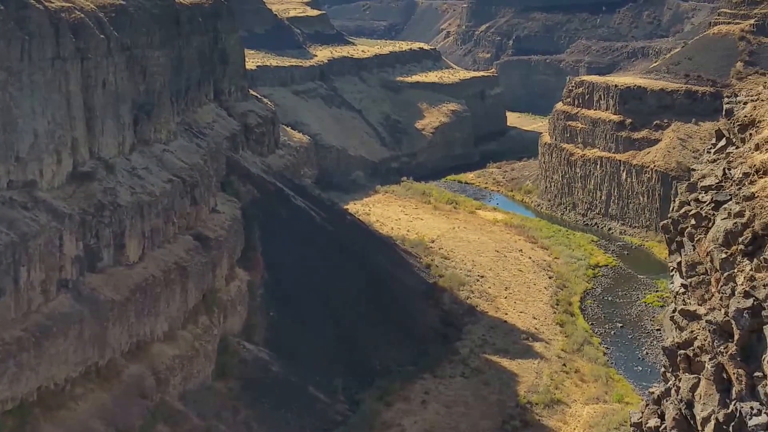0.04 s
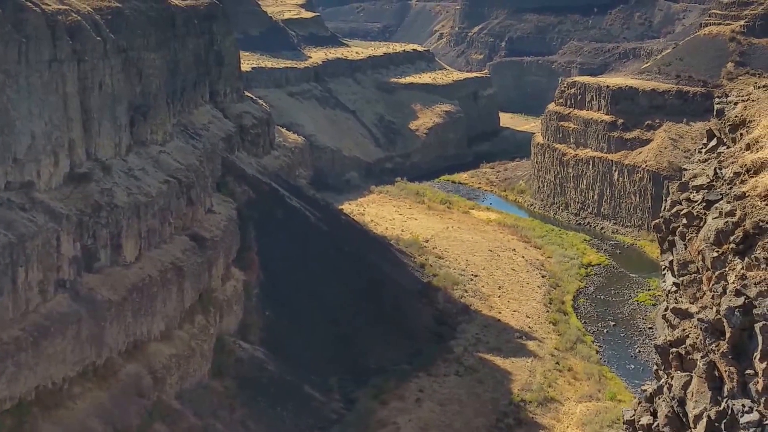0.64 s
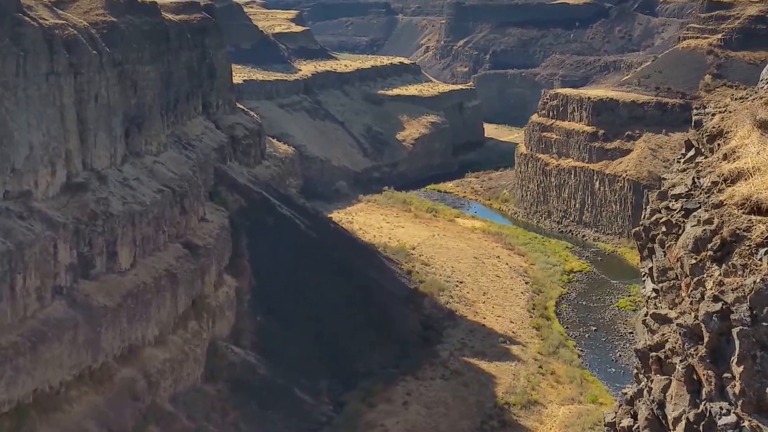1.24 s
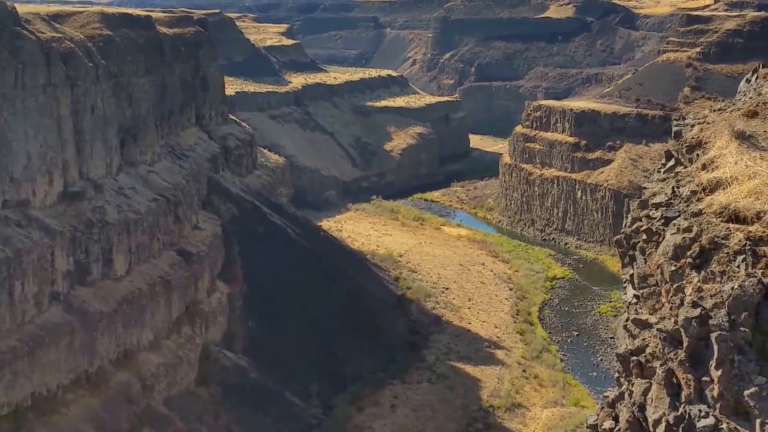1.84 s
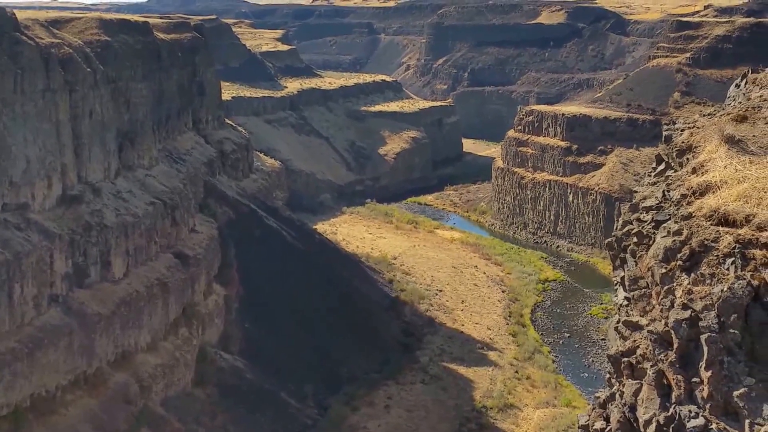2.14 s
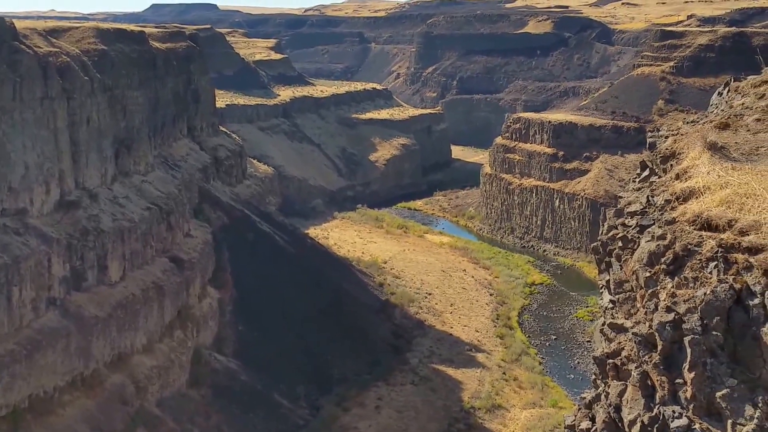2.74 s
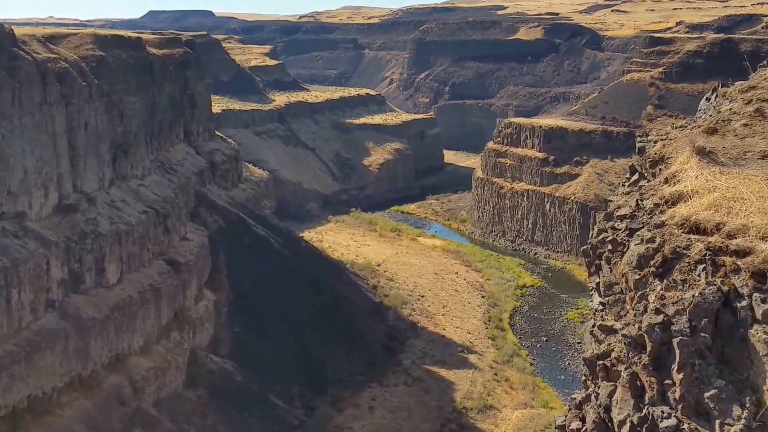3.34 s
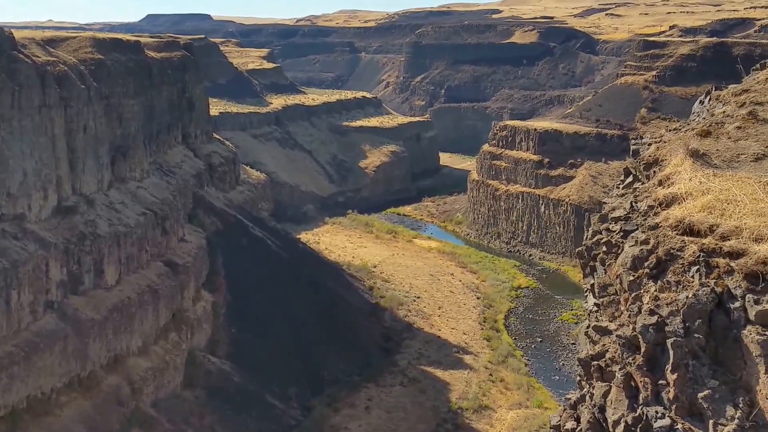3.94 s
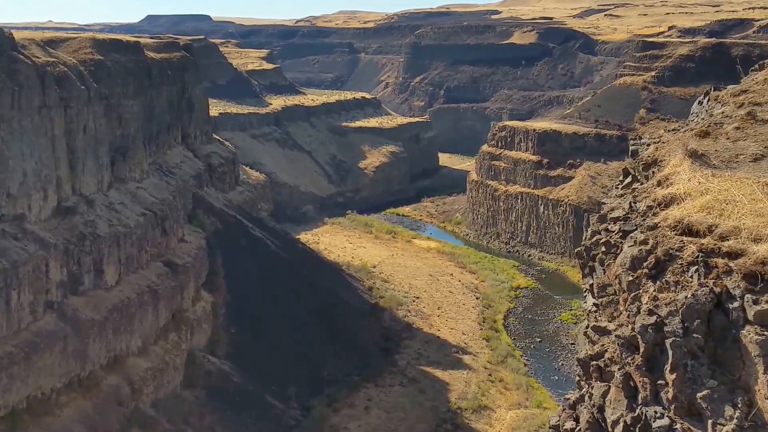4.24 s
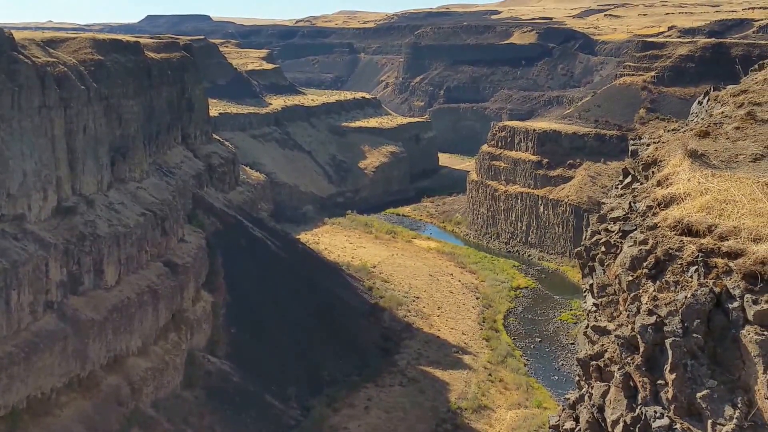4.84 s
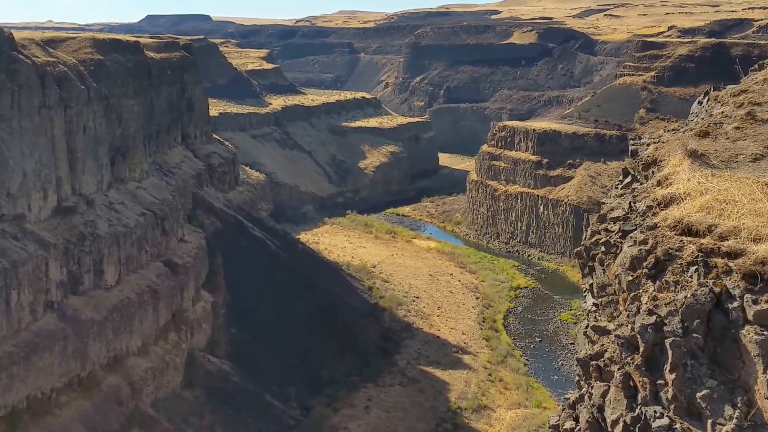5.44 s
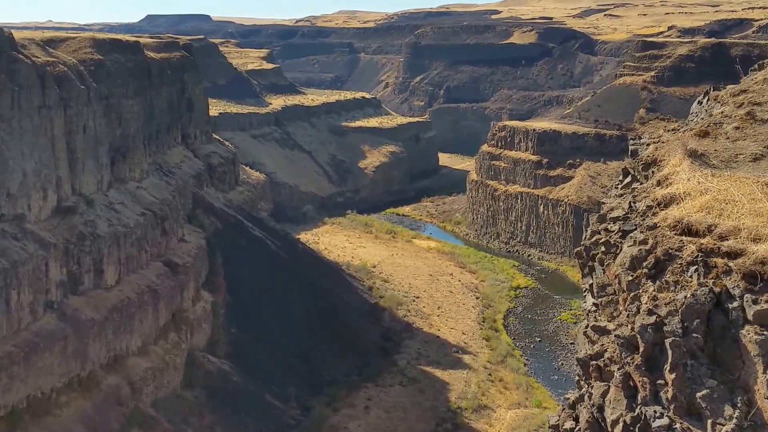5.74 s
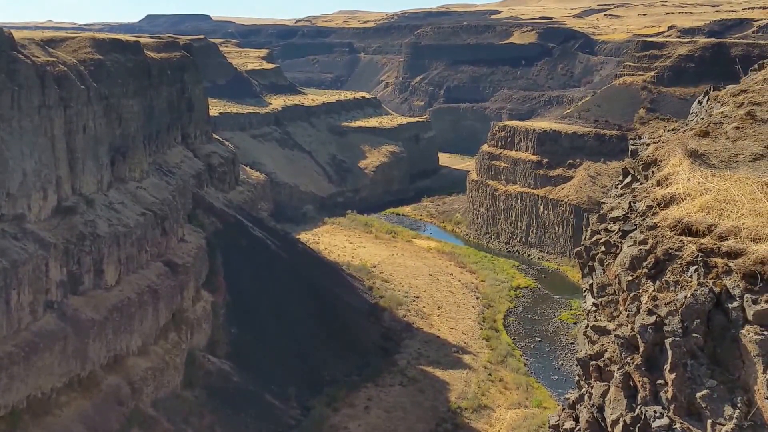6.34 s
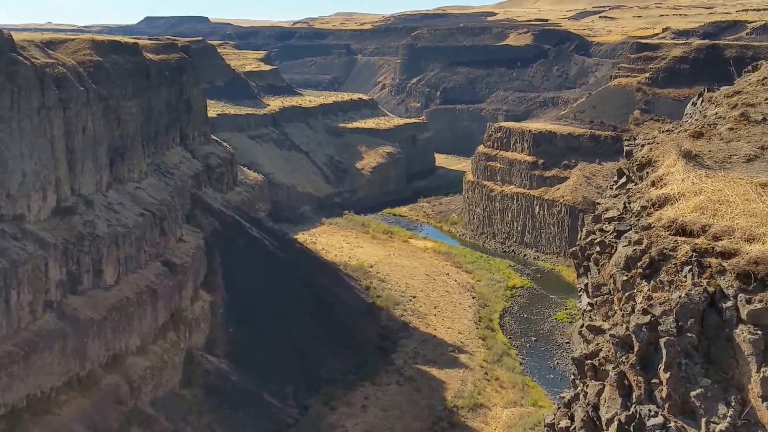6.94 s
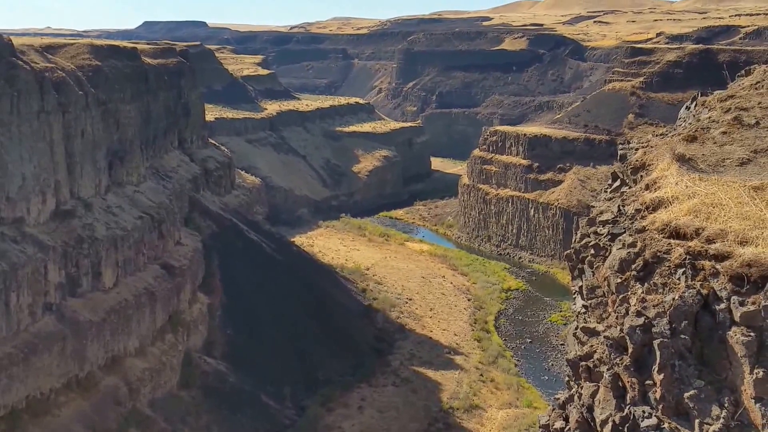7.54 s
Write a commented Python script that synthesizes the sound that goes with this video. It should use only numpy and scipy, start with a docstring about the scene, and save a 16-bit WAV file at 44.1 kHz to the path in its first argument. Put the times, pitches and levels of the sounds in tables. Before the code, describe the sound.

Gusty wind buffets the microphone with low, sputtering rumbles over the faint, steady rush of distant water.

```python
"""A waterfall and a river rush far below the rim of an open canyon; two microphones hiss faintly.
From the start, gusts buffet each microphone port on its own; from 0.5 s hard eddies slap the ports
and leave short churning wakes. An insect buzzes once at 1.4 s. From 2.4 s dry grit crackles nearby
now and then. The wind lulls from about 5.2 to 6.2 s, then gusts again."""
import sys
import numpy as np
from scipy import signal
from scipy.fft import rfft, irfft
from scipy.io import wavfile
from scipy.ndimage import uniform_filter1d, minimum_filter1d

SR = 44100
rng = np.random.default_rng(int(sys.argv[2]) if len(sys.argv) > 2 else 0)


def to_wav(sig):
    """Store sig (one row per channel, or 1-D mono) as 16-bit WAV at the path in sys.argv[1].

    Samples outside -1..1 are clipped; the rate is SR.
    """
    pcm = np.clip(np.atleast_2d(sig), -1, 1) * 32767
    pcm = np.round(pcm).astype(np.int16)
    wavfile.write(sys.argv[1], SR, pcm.T)  # frames by channels


N = 339570
TIME_S = np.arange(N) / SR
FREQ_HZ = np.fft.rfftfreq(N, 1 / SR)


def gain_of(db):
    """Decibels to amplitude."""
    return 10 ** (np.asarray(db) / 20)


def unit_rms(x):
    """Scale to rms 1."""
    return x / np.sqrt(np.mean(x ** 2) + 1e-20)


def curves(table, hz=FREQ_HZ):
    """Value columns of a table, interpolated over log frequency."""
    table_hz, *columns = np.transpose(table)
    return np.array([np.interp(np.log(hz + 1), np.log(table_hz + 1), c) for c in columns])


def add(mix, at_s, sound):
    """Mix a sound in, in place."""
    part = mix[..., max(round(at_s * SR), 0):][..., :sound.shape[-1]]
    part += sound[..., :part.shape[-1]]


def white():
    """White noise spectrum, unit power per Hz."""
    return rfft(rng.standard_normal(N)) * np.sqrt(SR / 2)


def wander(rate_hz):
    """Smooth random curve, rms 1."""
    return unit_rms(irfft(white() * np.exp(-(FREQ_HZ / rate_hz) ** 2) * (FREQ_HZ > 0), N))


# Distant water: f/Hz, left density/dB, right density/dB
WATER_SPECTRUM = [(30, -82, -95), (100, -77, -80.5), (270, -78, -76.5), (460, -82, -82),
                  (764, -78.5, -78.5), (1400, -80.5, -78.5), (1990, -82, -80.5), (2147, -79.5, -83.5),
                  (2990, -88.5, -94), (3360, -89, -91), (4280, -96.5, -91.5), (5320, -104.5, -102.6),
                  (6000, -104.8, -106.4), (6800, -112.6, -113.5)]
# Water between the ports: f/Hz, coherence/1, left lead/rad
WATER_COHERENCE = [(100, 0.61, 0.0), (300, 0.98, 0.2), (520, 0.83, 1.1), (750, 0.72, 0.9),
                   (1150, 0.56, 2.4), (1500, 0.74, 3.0), (1900, 0.43, 4.2), (2300, 0.65, 6.0),
                   (2600, 0.38, 6.1), (2800, 0.19, 5.0), (3300, 0.45, 4.6), (3700, 0.14, 5.6),
                   (4000, 0.27, 7.2), (4600, 0.18, 8.8), (5200, 0.34, 10.2), (5900, 0.09, 11.6)]


def water(swell_db=0.2, cutoff_hz=7000):
    """Countless far splashes merge into a smooth rush that reaches the left port first."""
    coherence, lead_rad = curves(WATER_COHERENCE)
    left = white()
    right = (coherence * left + np.sqrt(1 - coherence ** 2) * white()) * np.exp(-1j * lead_rad)
    distance_loss = 1 / np.hypot(1, (FREQ_HZ / cutoff_hz) ** 10)
    rush = irfft(np.array([left, right]) * gain_of(curves(WATER_SPECTRUM)) * distance_loss, N)
    return rush * gain_of(swell_db * wander(rate_hz=3.6))


# Microphone self-noise: f/Hz, left density/dB, right density/dB
HISS_SPECTRUM = [(7000, -116, -116), (8440, -115.5, -116.5), (10600, -112.1, -115.6),
                 (15000, -112.2, -114.2)]


def hiss():
    """Independent self-noise of two microphones."""
    return irfft(np.array([white(), white()]) * gain_of(curves(HISS_SPECTRUM)), N)


# Light air between gusts: t/s, level/dB
BREEZE_LEVELS = [(0, -48.5), (.3, -37.5), (1.35, -31.5), (1.93, -43.5), (2.3, -36), (3.15, -39.5),
                 (3.75, -30), (4.03, -48), (4.35, -35.5), (5.12, -45), (5.26, -70), (6.02, -63),
                 (6.27, -38), (6.5, -46.5), (6.87, -42), (7.1, -39), (7.7, -36)]


def breeze(port, right_db=-5, knee_hz=280):
    """Slow air makes a dull rumble. Returns flow: rows of power and power * knee_hz."""
    level_db = np.interp(TIME_S, *np.transpose(BREEZE_LEVELS)) + port * right_db
    return np.outer([1, knee_hz], gain_of(level_db) ** 2)


# Turbulent pressure: f/Hz, relative density/dB
TURBULENCE_SPECTRUM = [(15, -35), (40, -6), (65, -2), (110, 1), (200, -4.5), (400, -9), (800, -15),
                       (1600, -16)]


def turbulence(knee_hz, lump_db=5, lump_octaves=0.28, rolloff_order=3.96):
    """Sputtering rumble, running rms 1; eddies above a moving knee frequency die away."""
    lumps = np.clip(wander(rate_hz=60), -2, 1.8)
    cutoff_hz = knee_hz * 2 ** (lump_octaves * (lumps - 1))  # strong lumps of air are sharpest
    colour = gain_of(curves(TURBULENCE_SPECTRUM)[0]) / np.hypot(1, (FREQ_HZ / 1600) ** 4)
    eddies = rfft(unit_rms(irfft(white() * colour, N)))
    centres_hz = np.geomspace(100, 3200, 11)
    rumble = np.zeros(N)
    for hz, share in zip(centres_hz, np.eye(len(centres_hz))):
        band = irfft(eddies * np.interp(FREQ_HZ, centres_hz, share), N)
        rumble += band / np.hypot(1, (hz / cutoff_hz) ** rolloff_order)
    leak = signal.butter(2, 42, "highpass", fs=SR, output="sos")  # slow pressure leaks away
    rumble = signal.sosfilt(leak, rumble * gain_of(lump_db * lumps))
    window = signal.windows.hann(2201)
    power = signal.oaconvolve(rumble ** 2, window / window.sum(), "same")
    return rumble / np.sqrt(abs(power) + 1e-9)


def buffet(air_db, knee_hz, trim_db=-1.5, depth_db=3, db_per_octave=14):
    """Wind comes in random flurries; faster air is louder and brighter."""
    flurry_db = depth_db * np.clip(wander(rate_hz=32.2), -2, 2)
    rumble = turbulence(knee_hz * 2 ** (flurry_db / db_per_octave))
    return rumble * gain_of(air_db + flurry_db + trim_db)


def slap(at_s, peak_db, hz, skew=0.24, stretch=0.88, rebound_ratio=0.32, lead_s=0.006):
    """An eddy sucks sharply at a port; pressure rebounds and settles. Returns start/s, pulse."""
    t = np.arange(round(5 * lead_s * SR)) / SR - lead_s
    warped_time = np.log(np.maximum(1 + skew * 2 * np.pi * stretch * hz * t, 1e-6)) / skew
    suction = -np.exp(-warped_time ** 2 / 2)
    rebound_rad_s = 2 * np.pi * rebound_ratio * hz  # smaller eddies rebound sooner
    high_pass = signal.bilinear([1, 0, 0], [1, 2 * rebound_rad_s, rebound_rad_s ** 2], SR)
    pulse = signal.lfilter(*high_pass, suction)
    return at_s - lead_s, gain_of(peak_db) * pulse / abs(pulse).max()


def small_eddies(air_db, knee_hz, above_air_db=9, knee_ratio=0.52, spread_octaves=0.26):
    """Random small slaps crowd together as the wind gets sharper."""
    out = np.zeros(N)
    rate_per_s = 18 * (knee_hz / 450) ** 2
    chance, spread = rng.random(N), rng.standard_normal(N)
    for i in np.flatnonzero(chance < rate_per_s / SR):
        hz = knee_ratio * knee_hz[i] * 2 ** (spread_octaves * spread[i])
        add(out, *slap(TIME_S[i], air_db[i] + above_air_db, hz))
    return out


# Gusts at the ports: t/s, hold/s, left level/dB, right level/dB, knee f/Hz
GUST_EVENTS = [(0.175, 0.041, -33, -31.5, 408), (0.513, 0.027, -31.5, -31.5, 523),
               (0.595, 0.11, -26.5, -27.5, 460), (0.828, 0.09, -24.5, -24, 630),
               (0.967, 0.051, -21, -24, 850), (1.085, 0.014, -25.5, -35, 424),
               (1.175, 0.1, -28.5, -29.5, 676), (1.499, 0.041, -22.5, -30, 720),
               (1.657, 0.053, -23.5, -22.5, 606), (1.741, 0.01, -27, -49, 302),
               (2.018, 0.016, -27.5, -41, 243), (2.212, 0.078, -47, -32, 340),
               (2.415, 0.04, -28.5, -25, 400), (2.776, 0.036, -15.5, -26.5, 306),
               (2.835, 0.07, -21.5, -31, 400), (2.952, 0.11, -29, -25, 360),
               (3.385, 0.043, -36, -31.5, 312), (3.513, .25, -28, -29, 483),
               (3.822, 0.067, -27.5, -58, 420), (4.111, 0.067, -32, -50, 297.5),
               (4.259, 0.055, -28, -36, 338), (4.396, 0.029, -24, -40.5, 520),
               (4.518, 0.14, -33, -34.5, 305), (4.94, 0.058, -37, -72, 270), (5.039, 0.06, -44, -33, 292),
               (6.344, 0.096, -32, -30.5, 263), (6.491, 0.02, -52, -21.5, 536),
               (6.536, 0.14, -27, -33.5, 460), (6.988, 0.14, -22.5, -35, 395), (7.34, 0.074, -30, -56, 280),
               (7.479, 0.057, -26, -37, 270)]


def gusts(port, rise_s=0.013, fall_s=0.017):
    """Each gust arrives fast, holds and dies a little more slowly. Returns flow."""
    flow = np.zeros((2, N))
    for start_s, hold_s, *ports_db, knee_hz in GUST_EVENTS:
        t = np.arange(-5 * rise_s, hold_s + 5 * fall_s, 1 / SR)
        envelope = np.exp(np.minimum(t, 0) / rise_s - np.maximum(t - hold_s, 0) / fall_s)
        power = (gain_of(ports_db[port]) * envelope) ** 2
        add(flow, start_s + t[0], np.outer([1, knee_hz], power))
    return flow


# Hardest eddies: t/s, peak level/dB, nominal f/Hz, port (0 left, 1 right)
EDDY_EVENTS = [(0.5272, -6, 308, 0), (0.6384, -7, 654, 1), (0.6778, -4, 640, 0), (0.763, -12, 477, 1),
               (0.789, 1, 530, 1), (0.8519, -3.5, 470, 0), (0.9397, -7, 360, 0), (0.9706, -32, 443, 1),
               (1.009, -9.5, 850, 0), (1.1367, -7, 424, 1), (1.1682, -11.5, 428, 0), (1.2223, -4.5, 215, 0),
               (1.2755, -14, 473, 1), (1.309, -12, 334, 0), (1.5004, -17, 445, 0), (1.5157, -5, 357, 0),
               (1.703, -7.5, 530, 1), (2.305, -19, 280, 1), (2.3536, -9, 350, 1), (2.52, -14.5, 230, 0),
               (2.696, -12, 400, 0), (2.8517, -11.5, 309, 1), (2.8859, -6.5, 300, 0),
               (3.5384, -13.5, 320, 0), (3.7395, -16.5, 436, 1), (3.929, -17, 280, 1),
               (4.2914, -21, 261, 0), (4.4041, -10, 520, 0), (4.4969, -10, 340, 0), (4.673, -10.5, 250, 0),
               (6.3723, -17, 262, 1), (6.4842, -16, 320, 1), (6.5374, -11.5, 345, 0),
               (6.573, -13.5, 332, 0), (6.6683, -16.5, 371, 0), (6.7148, -14.5, 320, 1),
               (6.9843, -15, 328, 0), (7.038, -6, 308, 0), (7.4693, -14.5, 430, 0)]


def hard_eddies(port, wake_db=-14, rise_s=0.005, fall_s=0.014, knee_ratio=1.5):
    """Each hard eddy slaps one port and churns the air behind it. Returns slaps, wake flow."""
    slaps, wakes = np.zeros(N), np.zeros((2, N))
    t = np.arange(-3 * rise_s, 3 * fall_s, 1 / SR)
    envelope = np.exp(-(t / np.where(t < 0, rise_s, fall_s)) ** 2)
    for at_s, peak_db, hz, side in EDDY_EVENTS:
        if round(side) == port:
            add(slaps, *slap(at_s, peak_db, hz))
            power = (gain_of(peak_db + wake_db) * envelope) ** 2
            add(wakes, at_s + t[0], np.outer([1, knee_ratio * hz], power))
    return slaps, wakes


# Port cavity response: f/Hz, gain/dB
PORT_RESPONSE = [(120, 1), (240, -2), (450, -1), (680, 1.5), (950, -0.5), (1400, -1.5), (2400, -3.5)]


def wind():
    """Each port sits in its own turbulence, made slightly hollow by its small cavity."""
    pressure = np.zeros((2, N))
    for port in range(2):
        slaps, wakes = hard_eddies(port)
        power, weighted_knee = breeze(port) + gusts(port) + wakes
        air_db, knee_hz = 10 * np.log10(power), weighted_knee / power
        pressure[port] = buffet(air_db, knee_hz) + small_eddies(air_db, knee_hz) + slaps
    return irfft(rfft(pressure) * gain_of(curves(PORT_RESPONSE)), N)


def insect(at_s=1.37, half_width_s=0.056, pitch_hz=10400, half_width_hz=280, level_db=-81):
    """One faint, narrow buzz from the dry grass."""
    band = np.exp(-((FREQ_HZ - pitch_hz) / half_width_hz) ** 2)
    buzz = irfft(np.array([white(), white()]) * band, N)
    envelope = np.exp(-((TIME_S - at_s) / half_width_s) ** 2)
    return gain_of(level_db) * unit_rms(buzz) * envelope


# Grit crackles: t/s, relative level/dB, decay/s, tilt/(dB/octave)
GRIT_EVENTS = [(2.401, -51, .005, -2), (2.502, -53, .008, 4), (2.533, -52, 0.085, -4),
               (2.605, -43.5, 0.016, -10), (2.624, -50.5, 0.0097, 4), (4.685, -45, 0.0073, 0),
               (5.177, -36, 0.003, -0.5), (5.236, -52, 0.029, 11.5), (5.238, -45, 0.023, -9),
               (5.263, -43, 0.0037, 3), (5.270, -54, 0.028, 4), (5.314, -47, 0.0034, -1),
               (5.323, -36, 0.0014, 0), (5.936, -57, .015, 6), (5.971, -42, 0.004, 0),
               (5.989, -38, 0.0038, 2.5), (7.284, -52.5, .008, 6), (7.3, -54.5, 0.11, -3)]
# Grit colour: f/Hz, relative density/dB
GRIT_SPECTRUM = [(30, -70), (700, -31), (1800, 12.5), (2900, 12.5), (4200, -0.5), (6400, -6), (7800, -15),
                 (11000, -29), (16000, -24)]


def grit(trim_db=-1, pan_left_db=4, grain_db=2, rise_s=0.00027, samples=8192):
    """Dry grit crackles in short clusters of tiny uneven snaps."""
    out = np.zeros((2, N))
    t, hz = np.arange(samples) / SR, np.fft.rfftfreq(samples, 1 / SR)
    for at_s, level_db, decay_s, tilt_db in GRIT_EVENTS:
        snaps = rng.standard_normal((2, samples))
        snaps *= gain_of(grain_db * np.minimum(rng.exponential(1, samples), 4))
        colour = gain_of(curves(GRIT_SPECTRUM, hz) + tilt_db * np.log2(hz + 1000))
        envelope = (1 - np.exp(-t / rise_s)) * np.exp(-(t / decay_s) ** 2)
        burst = unit_rms(irfft(rfft(snaps) * colour, samples) * envelope)
        add(out, at_s, gain_of(level_db + trim_db) * burst * np.sqrt(np.mean(envelope ** 2)))
    return out * gain_of([[pan_left_db], [-pan_left_db]])


def limiter(x, threshold_db=-5, slope=0.346, release_db_per_s=45):
    """The hardest slaps pull both channels down, smoothly and just ahead of the peak."""
    peak_db = 20 * np.log10(abs(x).max(0) + 1e-9)
    cut_db = slope * np.maximum(peak_db - threshold_db, 0)
    release_db = TIME_S * release_db_per_s
    gain_db = release_db - np.maximum.accumulate(cut_db + release_db)
    held_db = minimum_filter1d(gain_db, size=260)
    return x * gain_of(uniform_filter1d(uniform_filter1d(held_db, size=130), size=130))


def scene():
    """Far water, hiss, wind on the ports, then an insect and grit close by."""
    return water() + hiss() + wind() + insect() + grit()


def record(dry, cutoff_hz=15800):
    """Limiter, then low-pass."""
    low_pass = signal.firwin(511, cutoff_hz, window=("kaiser", 9), fs=SR)
    return signal.oaconvolve(limiter(dry), low_pass[None], "same", axes=1)


dry = scene()
out = record(dry)
to_wav(out)
```